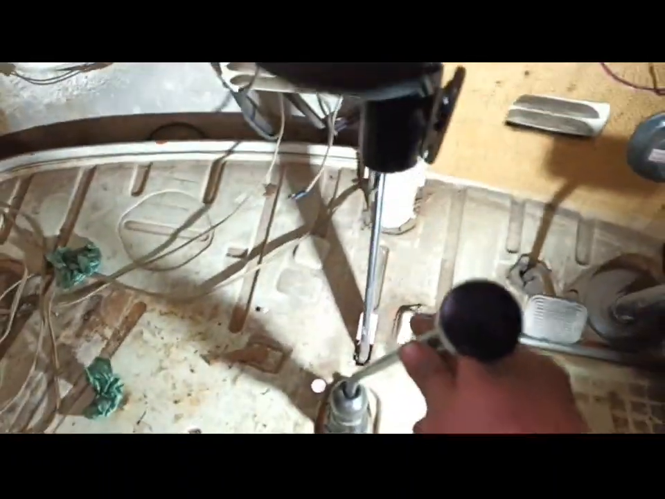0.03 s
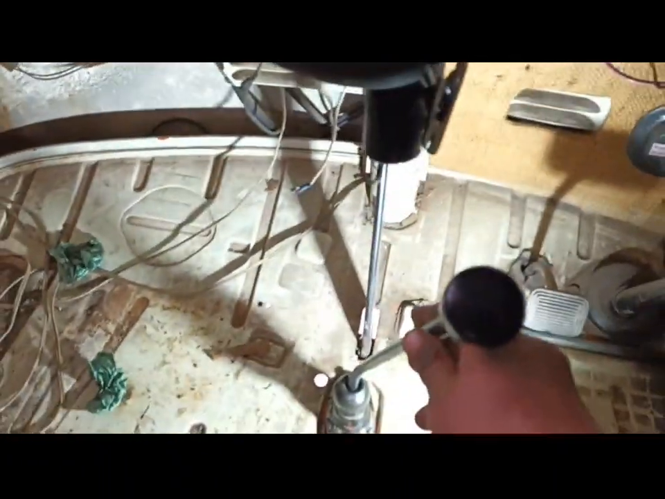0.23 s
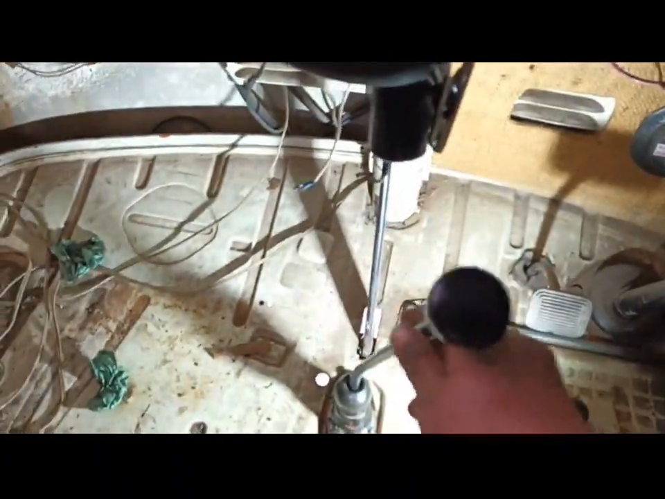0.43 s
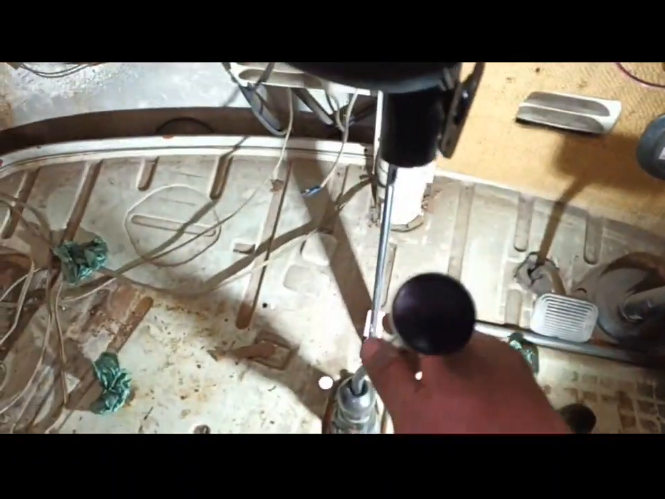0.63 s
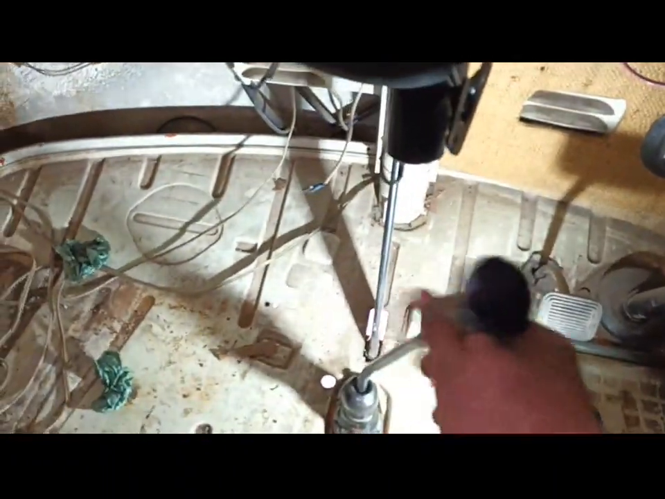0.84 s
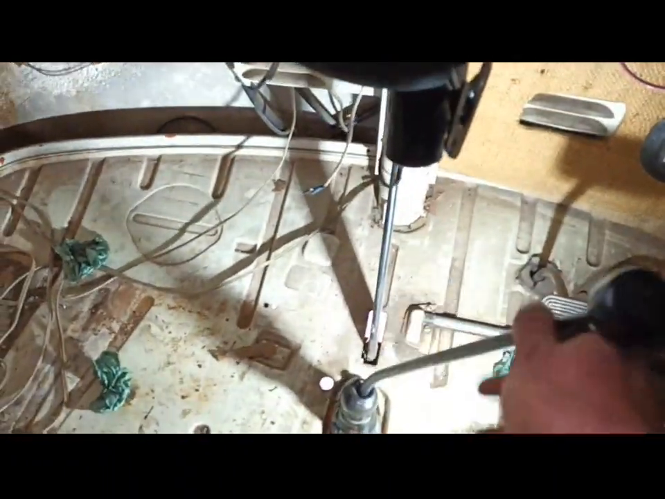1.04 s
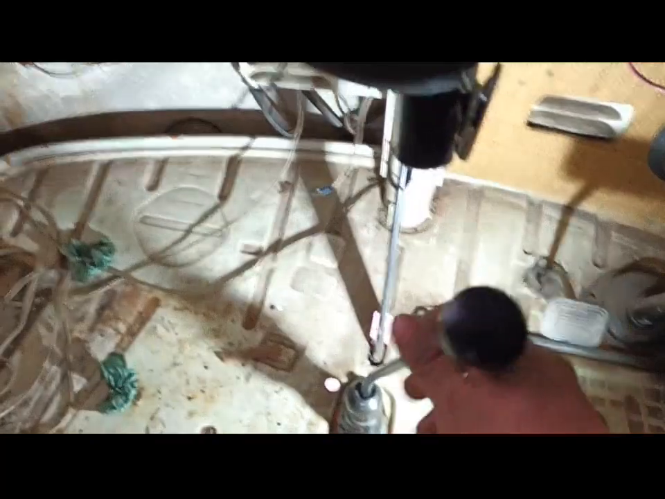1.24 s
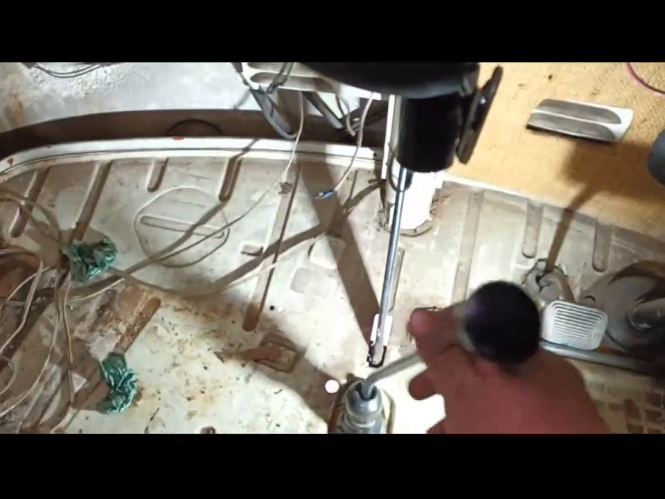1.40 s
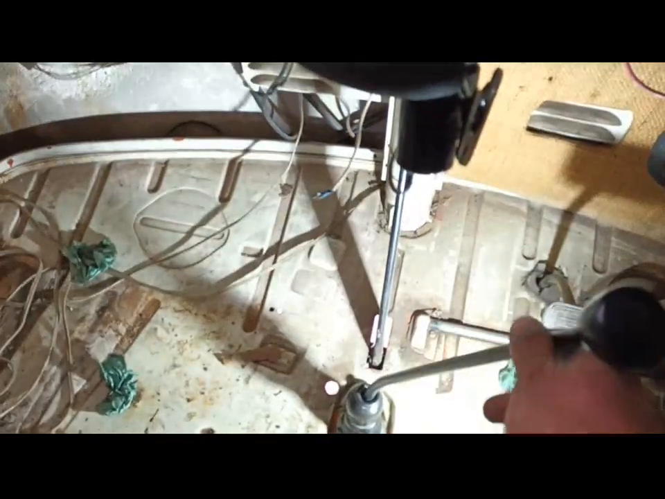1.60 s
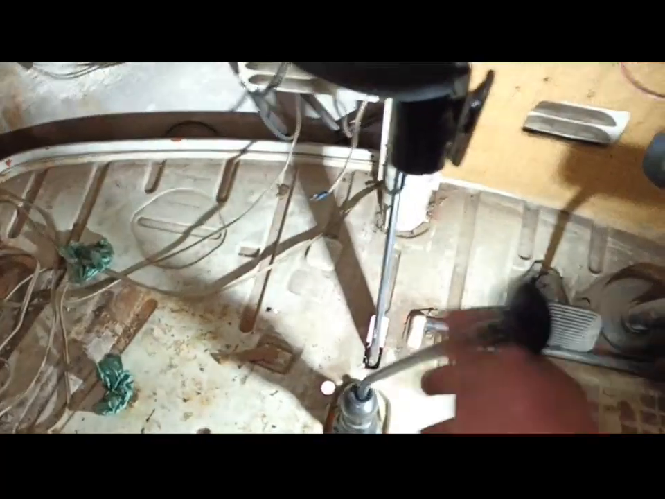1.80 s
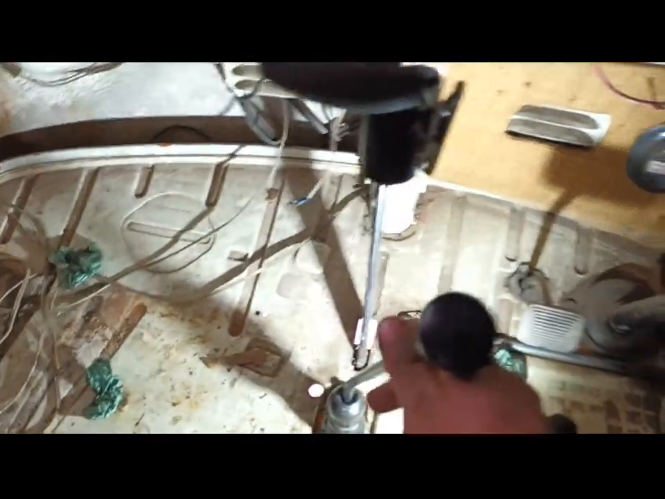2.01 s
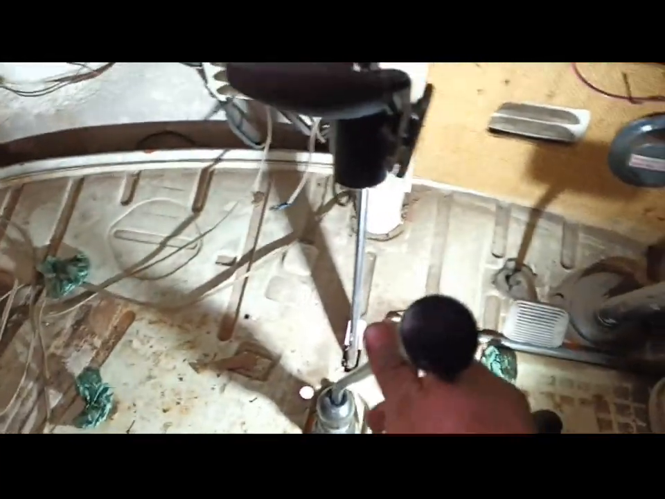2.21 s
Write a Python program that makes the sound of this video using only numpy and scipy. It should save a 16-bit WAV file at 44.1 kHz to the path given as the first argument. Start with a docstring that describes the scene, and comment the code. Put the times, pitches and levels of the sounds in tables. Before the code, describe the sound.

A gear lever is shifted by hand, making quick metallic clacks and dull clunks.

```python
"""A long gear lever is pushed through its gates in the stripped cab of a small vehicle in a garage.
Each shift takes up the slack of the rod linkage with bright clacks, then lands with a dull clunk
that sets the bare steel floor ringing and the cab booming. The lever's joint creaks briefly.
Soft rubbing swells with each move of the arm, over a quiet room; a low rumble rises at the end."""
import sys
import numpy as np
from scipy import signal
from scipy.io import wavfile
from scipy.ndimage import uniform_filter1d

SR = 44100
rng = np.random.default_rng(int(sys.argv[2]) if len(sys.argv) > 2 else 0)


def to_wav(sig):
    """Store sig (one row per channel, or 1-D mono) as 16-bit WAV at the path in sys.argv[1].

    Samples outside -1..1 are clipped; the rate is SR.
    """
    pcm = np.clip(np.atleast_2d(sig), -1, 1) * 32767
    pcm = np.round(pcm).astype(np.int16)
    wavfile.write(sys.argv[1], SR, pcm.T)  # frames by channels


N = 99269

# metal on metal in the linkage:
# (time [s], hollow knock [dB], rod clink [dB], tick [dB], left-right [dB], favoured pitch [Hz])
LINKAGE_CLACKS = [(.402, -36.5, -51, -55, -2, 720), (0.7183, -35.5, -60, -78, -4.5, 820),
                  (.7675, -36, -57, -67, -5, 640), (0.8139, -34.5, -38.5, -50.5, -1.5, 2750),
                  (1.034, -34.5, -45, -57, -3.5, 4000), (1.040, -28, -43, -48, -3, 560),
                  (1.0865, -32, -39, -45.5, -2.5, 1050), (1.126, -53, -45, -64, 7, 4500),
                  (1.135, -31, -46, -53, -6, 2186), (1.3161, -28, -43.5, -92, 1, 640),
                  (1.449, -46.5, -88, -87, -5, 1130), (1.632, -49.5, -76, -103, -4, 640),
                  (1.691, -41.5, -51, -59, 3.5, 1100), (1.696, -31.5, -41, -39.5, -1.5, 1130),
                  (1.736, -35, -48.5, -57, 1, 4300), (1.766, -37, -58.5, -63.5, -1, 4500),
                  (1.883, -66, -69, -60.5, 1, 10500), (1.943, -53.5, -64, -69.5, 1.5, 15000)]
# lever against a stop: (time [s], floor thud [dB], contact corner [Hz], cab boom [dB])
LEVER_CLUNKS = [(0.398, -39, 198, -35), (0.406, -37.5, 620, -33.5), (.787, -31, 400, -62.5),
                (.822, -26.5, 446, -32), (0.846, -34.5, 410, -29.5), (.879, -35.5, 254, -28.5),
                (1.044, -33, 594, -33), (1.105, -29, 594, -31.5), (1.145, -23.5, 905, -24),
                (1.163, -27, 1050, -27.5), (1.334, -34, 830, -39), (1.4629, -40.5, 640, -39.5),
                (1.5, -71, 248, -38.5), (1.5364, -67, 150, -62), (1.708, -25.5, 442, -33.5),
                (1.772, -27.5, 800, -47), (1.786, -33.5, 714, -29), (1.83, -37.5, 800, -45)]
# boom and rumble spectrum: (frequency [Hz], third-octave level [dB])
BOOM_SPECTRUM = [(30, -46), (48, -35), (62, -12.5), (80, -17), (115, -14), (170, -17.5), (300, -34),
                 (1000, -60)]
# stereo balance: (frequency [Hz], left-right [dB])
STEREO_BALANCE = [(60, 0), (400, 0.9), (1200, -1), (4000, 1), (10000, 3.5), (15000, 0.5)]


def from_db(db):
    """Decibels to gain."""
    return 10 ** (np.asarray(db) / 20)


def at_hz(points, hz):
    """Interpolate a table over log frequency."""
    points_hz, values = np.transpose(points)
    return np.interp(np.log(hz), np.log(points_hz), values)


def panned(db):
    """Left and right gains for a level difference."""
    return from_db(np.array([[.5], [-.5]]) * db)


def bandpass(x, hz, ratio):
    """Pass hz / ratio to hz * ratio."""
    edges_hz = np.minimum([hz / ratio, hz * ratio], .48 * SR)
    return signal.sosfilt(signal.butter(2, edges_hz, "band", fs=SR, output="sos"), x)


def swell(centre_s, half_s):
    """Rounded rise and fall, peak 1."""
    t = np.arange(N) / SR
    return 1 / np.cosh(np.clip((t - centre_s) / half_s * np.sqrt(2), -50, 50))


def clicks(times_s, sizes):
    """Stereo impulse train."""
    out = 1e-18 * rng.random((2, N))
    out[:, np.clip((times_s * SR).astype(int), 0, N - 1)] += sizes
    return out


def ring(x, hz, t60_s):
    """One mode: a unit click starts a decaying sine of height 1."""
    r = np.exp(-np.log(1000) / (t60_s * SR))
    w = 2 * np.pi * hz / SR
    return signal.lfilter([0, np.sin(w)], [1, -2 * r * np.cos(w), r * r], x)


def decay(power, t60_s):
    """Stored energy leaks away."""
    return signal.lfilter([1], [1, -np.exp(-2 * np.log(1000) / (t60_s * SR))], power)


def cut_faint_tail(x, stop_db):
    """A ring fades out quickly once it sinks to stop_db."""
    power = np.abs(uniform_filter1d(np.mean(x * x, axis=0), size=800))
    return x * power / (power + from_db(stop_db) ** 2)


def struck(modes, times_s, strength_at, stop_db, scatter_db=1, spread_db=3):
    """Each blow rings every mode, with random scatter in level and side."""
    out = 0
    for hz, db, t60_s in modes:
        scatter, side = rng.standard_normal((len(times_s), 2)).T
        sizes = strength_at(hz) * from_db(db + scatter_db * scatter)
        sides = panned(at_hz(STEREO_BALANCE, hz) + spread_db * side)
        ringing = ring(clicks(times_s, sizes * sides), hz, t60_s)
        out = out + cut_faint_tail(bandpass(ringing, hz, np.sqrt(2)), stop_db)
    return out


def band_noise(white, hz):
    """Third octave of stereo noise, slow swings levelled; rms about 1."""
    # stereo likeness: (frequency [Hz], left-right correlation [-1..1])
    likeness = [(60, 0.95), (125, 0.55), (300, 0.88), (600, 0.28), (1100, -0.44), (4500, -0.05),
                (10000, 0.74), (15000, 1)]
    mid, side = bandpass(white, hz, 2 ** (1 / 6))
    alike = np.clip(at_hz(likeness, hz), -.98, .98)
    noise = np.sqrt(1 + alike) * mid + np.sqrt(1 - alike) * side * np.array([[1], [-1]])
    power = uniform_filter1d(np.mean(noise * noise, axis=0), size=int(SR * (.012 + 3 / hz)))
    levelled = noise / np.sqrt(np.abs(power) + 1e-20)
    return levelled[:, -N:] * panned(at_hz(STEREO_BALANCE, hz))


def room_power(hz):
    """Quiet room noise in one band; the level sags midway."""
    # room noise: (frequency [Hz], third-octave level [dB])
    spectrum = [(25, -119.5), (60, -74), (110, -83), (280, -75), (450, -82), (1000, -85.5), (5000, -83),
                (8000, -78), (10000, -82), (16000, -86.5)]
    # room level: (time [s], gain [dB])
    level = [(.33, 2.5), (.6, -4), (1.0, -11), (1.58, -5.5), (2.03, -4.5), (2.25, 3)]
    gain_db = np.interp(np.arange(N) / SR, *np.transpose(level))
    return from_db(gain_db + at_hz(spectrum, hz)) ** 2


def rumble_power(hz, gain_db=-47.5):
    """Low rumble in one band, swelling at the end."""
    return (from_db(gain_db + at_hz(BOOM_SPECTRUM, hz)) * swell(centre_s=2.25, half_s=0.02)) ** 2


def rubbing_power(hz):
    """Arm and rod rub as they move; one band."""
    # arm moves: (time of top speed [s], level [dB], half length [s])
    strokes = [(0.437, -58, 0.05), (0.811, -53.5, 0.052), (0.904, -58, 0.036), (1.112, -55.5, 0.043),
               (1.42, -69.5, 0.054), (1.721, -58.5, 0.041), (1.82, -67.5, 0.084), (1.954, -70, 0.028)]
    # rubbing: (frequency [Hz], third-octave level [dB])
    spectrum = [(200, -5), (4500, -8), (8000, -1), (10000, -6), (16000, -12)]
    power = sum((from_db(db) * swell(time_s, half_s)) ** 2 for time_s, db, half_s in strokes)
    return power * from_db(at_hz(spectrum, hz)) ** 2


def joint_creaks(band_ratio=1.23):
    """Friction briefly sustains one resonance of the lever's joint."""
    # creaks: (centre [s], length [s], pitch [Hz], level [dB])
    creaks = [(0.397, 0.03, 590, -47.5), (0.5, 0.038, 477, -57), (1.672, 0.084, 473, -49.5),
              (1.964, 0.053, 413, -55.5), (2.079, 0.026, 590, -64)]
    t = np.arange(N) / SR
    out = 0
    for centre_s, length_s, hz, db in creaks:
        gate = np.exp(-((t - centre_s) / (length_s / 2)) ** 6)
        tone = gate * bandpass(rng.standard_normal(N), hz, band_ratio)
        out = out + from_db(db) * tone * np.sqrt(np.sum(gate ** 2) / np.sum(tone ** 2))
    return out


def contact_focus(hz, boost_db=6, width_octaves=0.25):
    """Gain per clack: its point of contact brings out one region of pitch."""
    octaves = np.log2(hz / np.array(LINKAGE_CLACKS)[:, -1])
    return from_db(boost_db * np.exp(-(octaves / width_octaves) ** 2))


def contact_lowpass(hz, corner_hz):
    """Gain of a soft contact: little above its corner."""
    return 1 / np.sqrt(1 + (hz / corner_hz) ** 4)


def clatter_power(hz, stop_db=-69.5, crack_db=1.5, build_s=0.0006):
    """Blows ring the dense modes of one band, with faint tails cut short; clacks add a short crack."""
    # dense-mode spectra: (frequency [Hz], third-octave level [dB])
    knock_spectrum = [(60, -32.5), (280, -23.5), (420, -4.5), (680, -5.5), (860, -18), (1100, -5.5),
                      (1600, -18), (2500, -33.5), (5000, -70), (16000, -101)]
    clink_spectrum = [(400, -30), (1200, -4.5), (2200, 2), (3100, -7), (4200, -3.5), (5100, -19.5),
                      (16000, -64)]
    tick_spectrum = [(2000, -11), (4500, -3), (6000, -0.5), (8000, -3.5), (10000, -2.5), (16000, -32.5)]
    thud_spectrum = [(60, -41.5), (125, -12.5), (190, -19.5), (270, -4.5), (520, -7.5), (680, 3),
                     (860, -10), (1100, 1), (2000, -44.5), (16000, -30)]
    # dense-mode decay: (frequency [Hz], t60 [s])
    ring_times = [(60, 0.38), (120, 0.47), (300, .25), (700, 0.21), (2000, 0.18), (5000, 0.11),
                  (10000, 0.048)]

    clack_s, knock_db, clink_db, tick_db, side_db, _ = np.transpose(LINKAGE_CLACKS)
    parts = (knock_db, knock_spectrum), (clink_db, clink_spectrum), (tick_db, tick_spectrum)
    bright = sum(from_db(db + at_hz(spectrum, hz)) ** 2 for db, spectrum in parts)
    clacks = clicks(clack_s, bright * (contact_focus(hz) * panned(side_db)) ** 2)

    clunk_s, thud_db, corner_hz, boom_db = np.transpose(LEVER_CLUNKS)
    thud = from_db(thud_db + at_hz(thud_spectrum, hz)) * contact_lowpass(hz, corner_hz)
    boom = from_db(boom_db + at_hz(BOOM_SPECTRUM, hz))
    clunks = clicks(clunk_s, thud ** 2 + boom ** 2)

    tail = decay(clacks + clunks, at_hz(ring_times, hz))
    tail = tail * tail / (tail + from_db(stop_db) ** 2)
    crack = from_db(crack_db) ** 2 * decay(clacks, t60_s=0.0035)
    r = np.exp(-1 / (SR * (build_s / 2 + .3 / hz)))   # low bands build up more slowly
    return signal.lfilter([(1 - r) ** 2], [1, -2 * r, r * r], np.sqrt(tail + crack)) ** 2


def linkage_clacks():
    """Slack closes: metal on metal rings the hollow linkage and the shift rod."""
    # linkage and rod modes: (frequency [Hz], level [dB], t60 [s])
    hollow_modes = [(488.8, -8, 0.25), (644.5, -9, 0.32), (740.5, -10.5, 0.15), (803.8, -8, 0.21),
                    (1061, -7, 0.12), (1127, -14, 0.16)]
    rod_modes = [(1507, -11, 0.25), (2261, -21.5, 0.48), (2400, -4.5, 0.1)]
    times_s, knock_db, clink_db, *_ = np.transpose(LINKAGE_CLACKS)
    hollow = struck(hollow_modes, times_s, lambda hz: from_db(knock_db) * contact_focus(hz),
                    stop_db=-62.5)
    rod = struck(rod_modes, times_s, lambda hz: from_db(clink_db) * contact_focus(hz), stop_db=-92)
    return hollow + rod


def lever_clunks():
    """The lever hits a stop: the floor pan rings, the cab booms."""
    # floor pan and cab modes: (frequency [Hz], level [dB], t60 [s])
    floor_modes = [(265.9, -6.5, 0.4), (297.7, -4, 0.2), (351.8, -2, 0.31), (407.4, -8, 0.4),
                   (484.3, -7.5, 0.3), (535, -15, 0.41), (629, -4.5, 0.18), (693, -1.5, 0.14),
                   (783, -11.5, 0.37), (1013, -10.5, 0.32)]
    cab_modes = [(66, -10, 0.27), (90.5, -11, 0.1), (112.2, -0.5, 0.38)]
    times_s, thud_db, corner_hz, boom_db = np.transpose(LEVER_CLUNKS)
    floor = struck(floor_modes, times_s, lambda hz: from_db(thud_db) * contact_lowpass(hz, corner_hz),
                   stop_db=-58.5)
    cab = struck(cab_modes, times_s, lambda hz: from_db(boom_db), stop_db=-52)
    return floor + cab


def scene():
    """Clacks, clunks and creaks, plus room, rumble, rubbing and clatter in third octaves."""
    bands_hz = 10000 * 2 ** (np.arange(-26, 3) / 3)
    white = rng.standard_normal((2, 2, N + SR // 4))   # adjacent bands get independent noise
    out = linkage_clacks() + lever_clunks() + joint_creaks()
    for k, hz in enumerate(bands_hz):
        power = room_power(hz) + rumble_power(hz) + rubbing_power(hz) + clatter_power(hz)
        out = out + np.sqrt(power) * band_noise(white[k % 2], hz)
    return out


def record(dry):
    """The microphone colours the treble; the top is cut steeply."""
    # microphone peaks and dips: (centre [Hz], width [Hz], gain [dB])
    mic_peaks = [(7920, 5200, -13.5), (10130, 870, 8.5), (13100, 4000, -6.5), (15300, 600, 9)]
    cutoff_hz = 15900
    for hz, width_hz, db in mic_peaks:
        band = signal.lfilter(*signal.iirpeak(hz, hz / width_hz, fs=SR), dry)
        dry = dry + (from_db(db) - 1) * band
    return signal.sosfilt(signal.ellip(12, .2, 80, cutoff_hz, fs=SR, output="sos"), dry)


dry = scene()
out = record(dry)
to_wav(out)
```